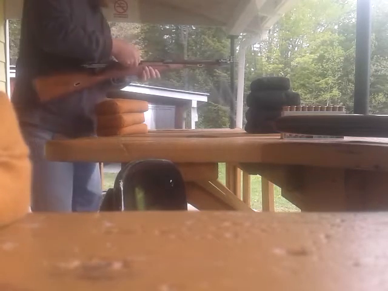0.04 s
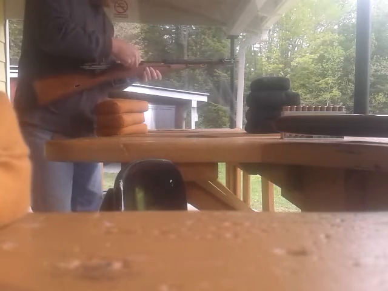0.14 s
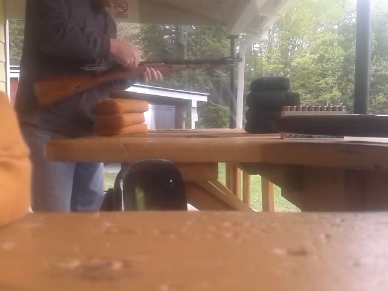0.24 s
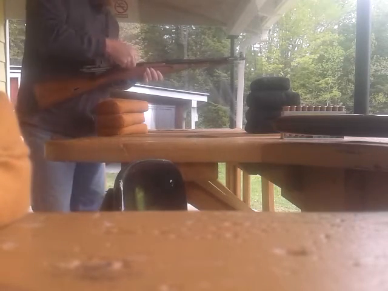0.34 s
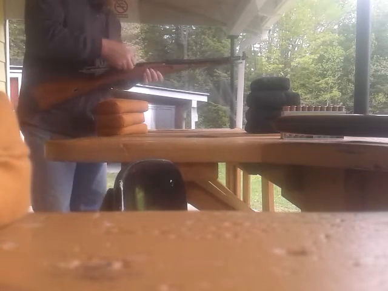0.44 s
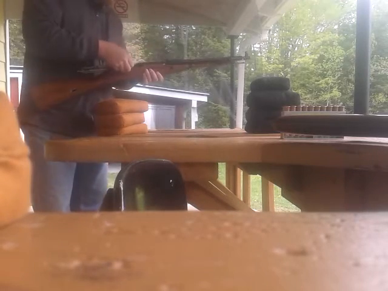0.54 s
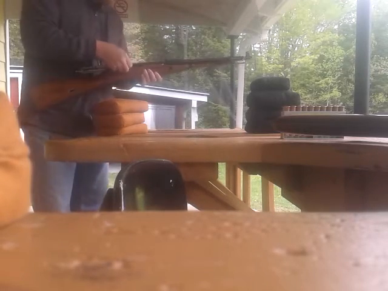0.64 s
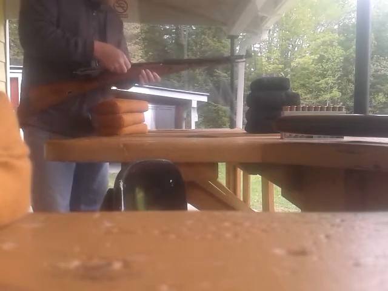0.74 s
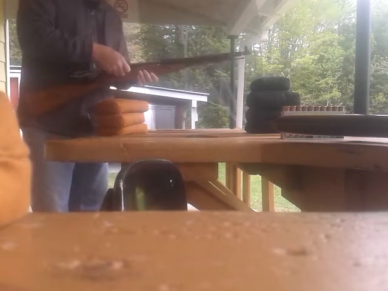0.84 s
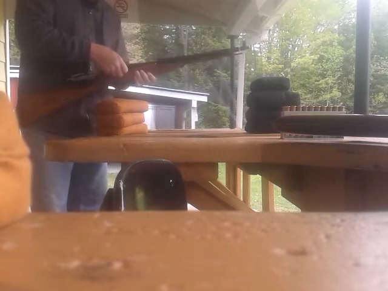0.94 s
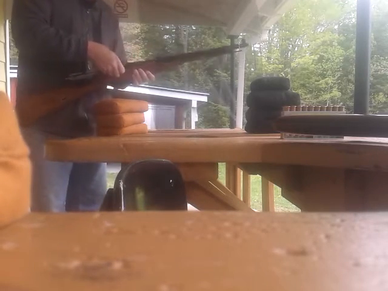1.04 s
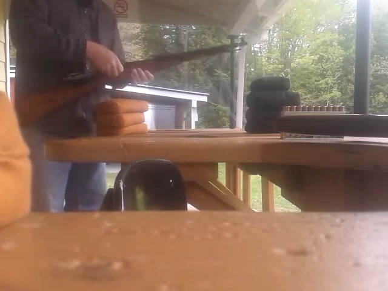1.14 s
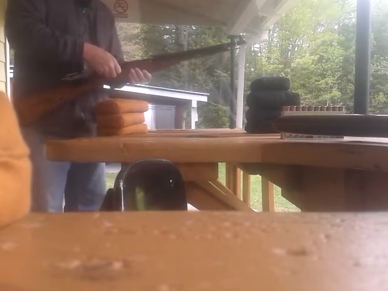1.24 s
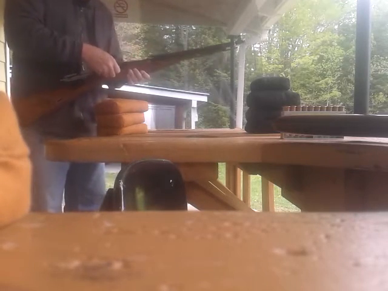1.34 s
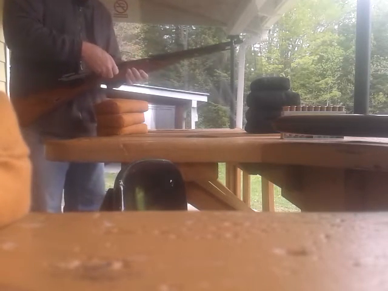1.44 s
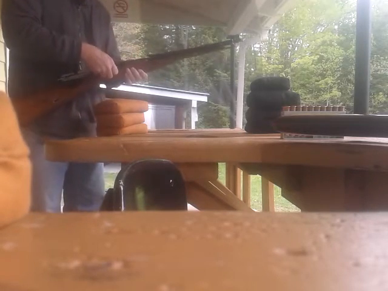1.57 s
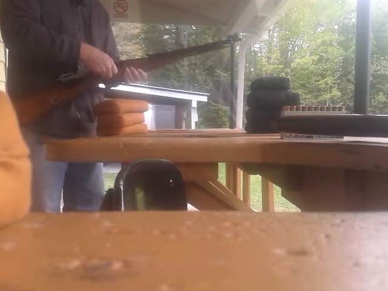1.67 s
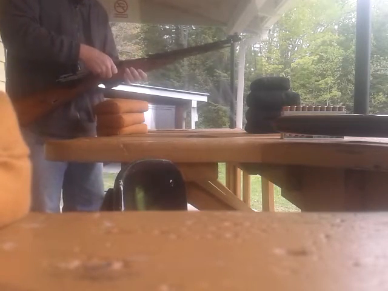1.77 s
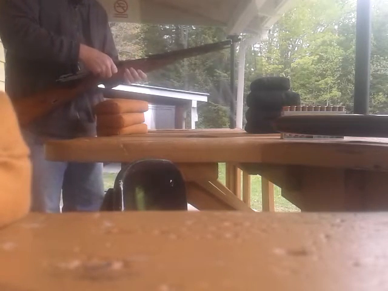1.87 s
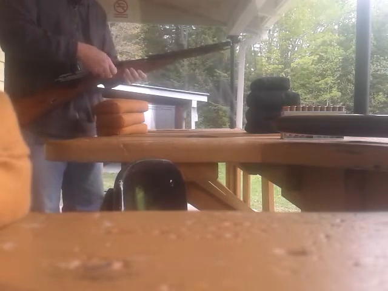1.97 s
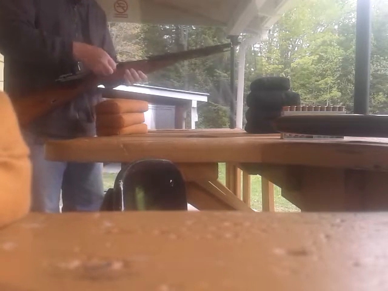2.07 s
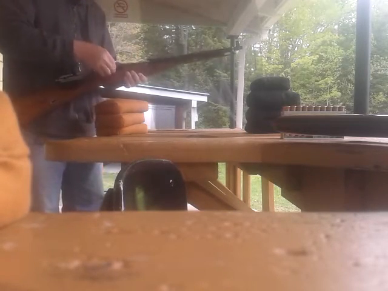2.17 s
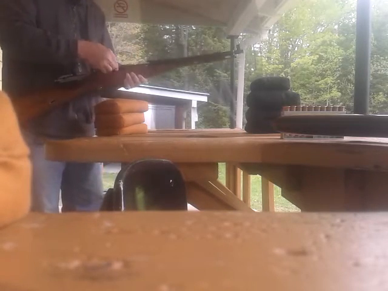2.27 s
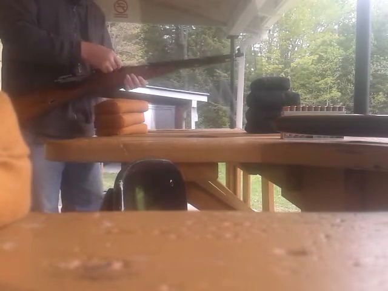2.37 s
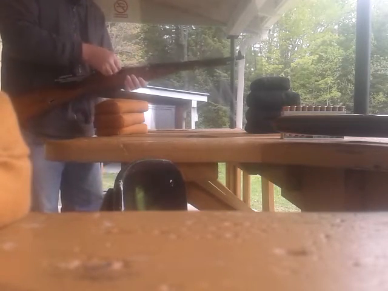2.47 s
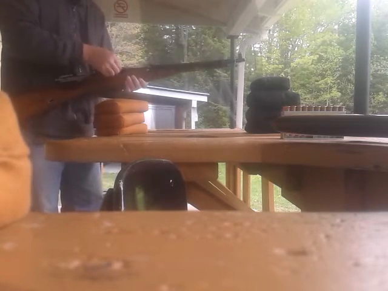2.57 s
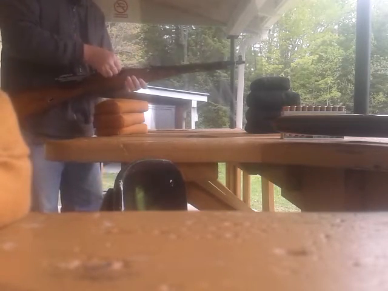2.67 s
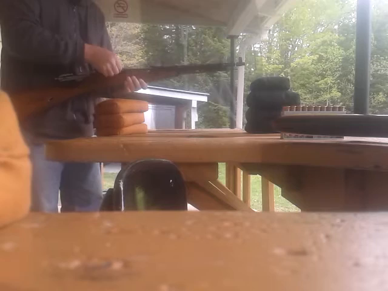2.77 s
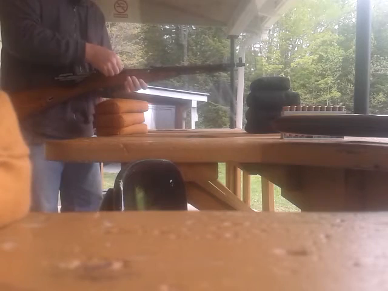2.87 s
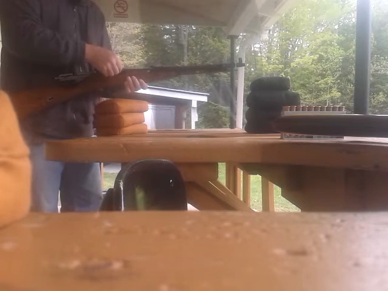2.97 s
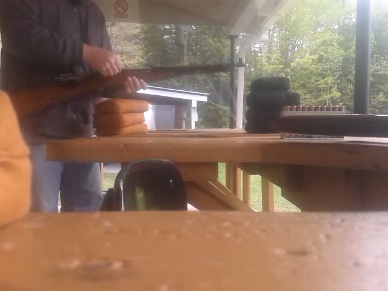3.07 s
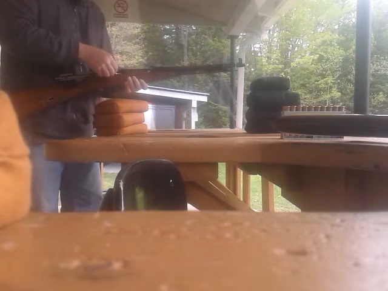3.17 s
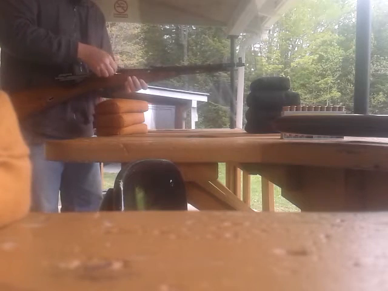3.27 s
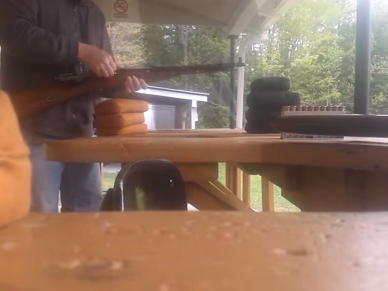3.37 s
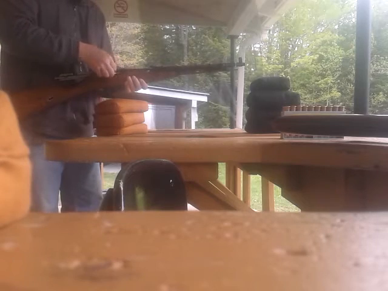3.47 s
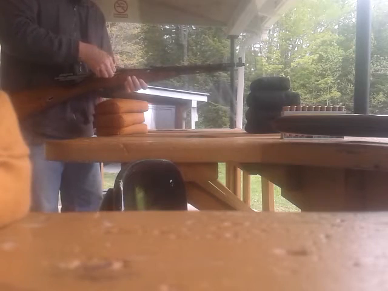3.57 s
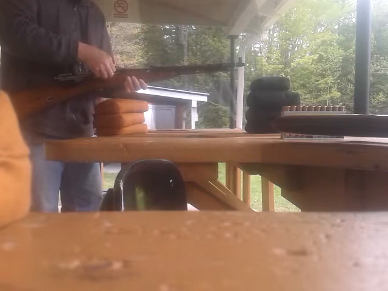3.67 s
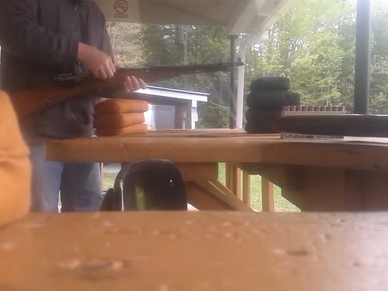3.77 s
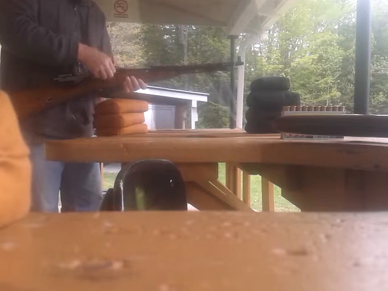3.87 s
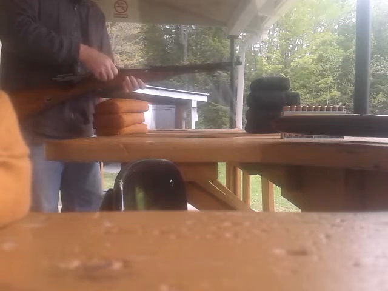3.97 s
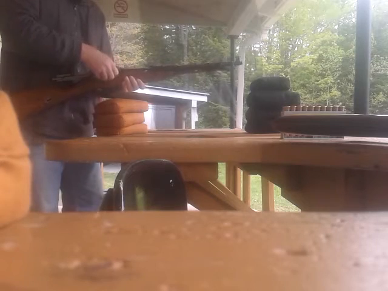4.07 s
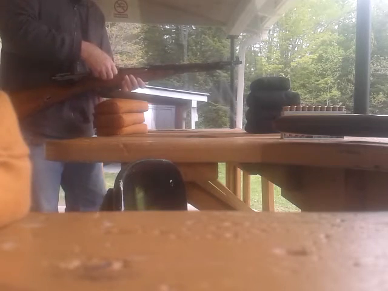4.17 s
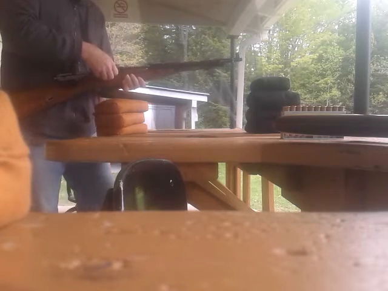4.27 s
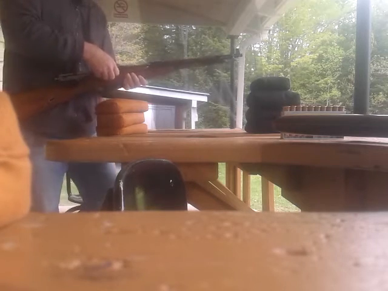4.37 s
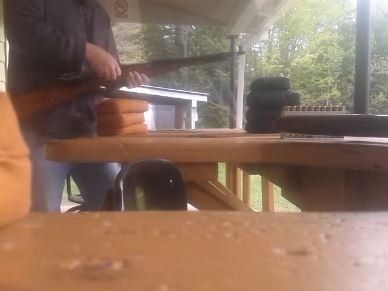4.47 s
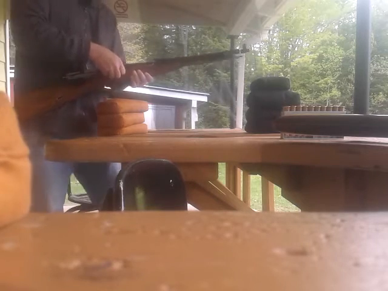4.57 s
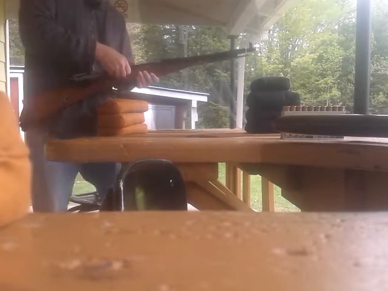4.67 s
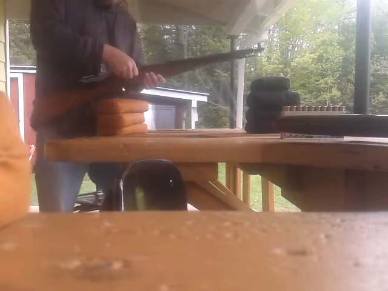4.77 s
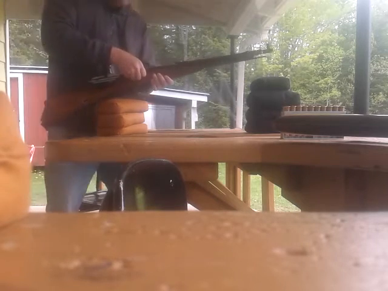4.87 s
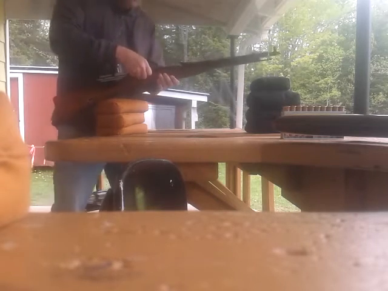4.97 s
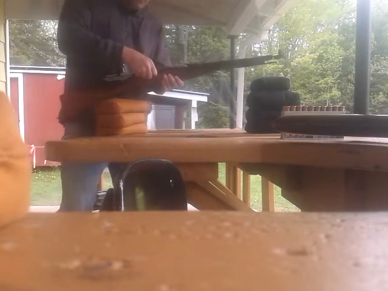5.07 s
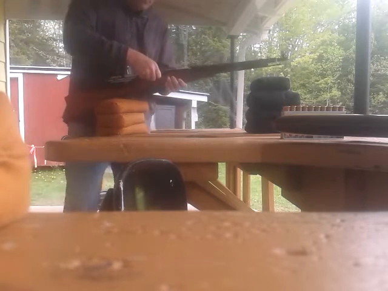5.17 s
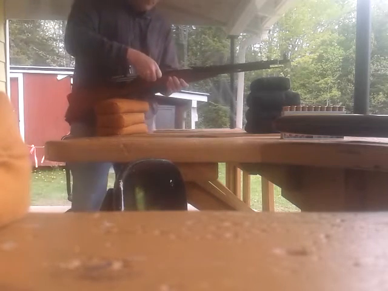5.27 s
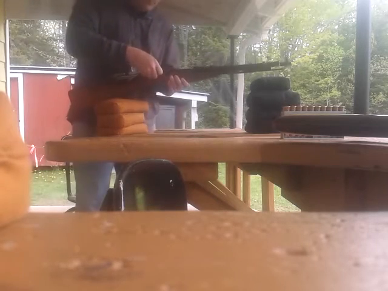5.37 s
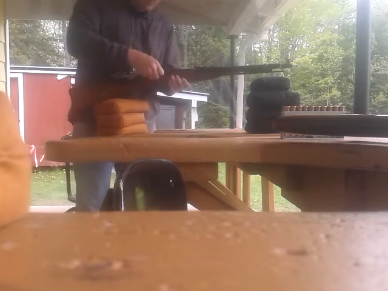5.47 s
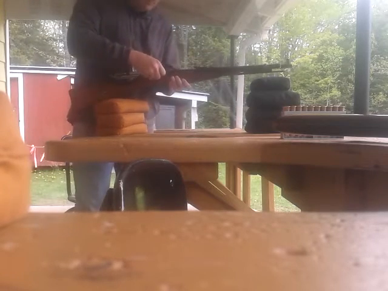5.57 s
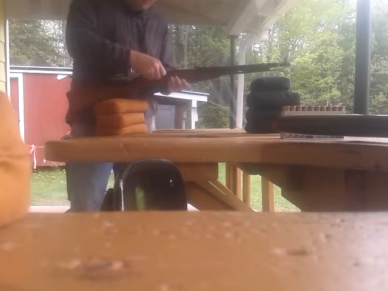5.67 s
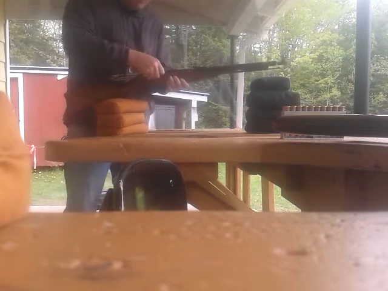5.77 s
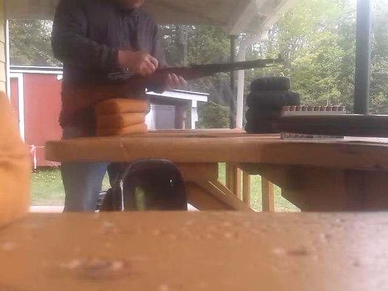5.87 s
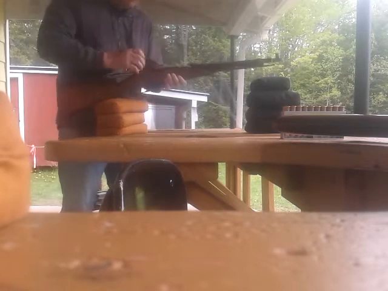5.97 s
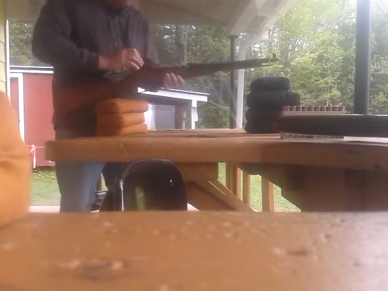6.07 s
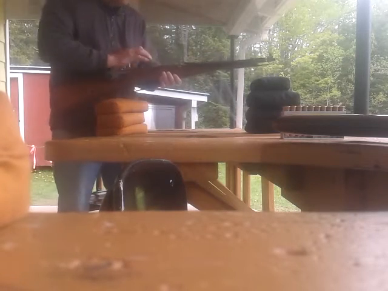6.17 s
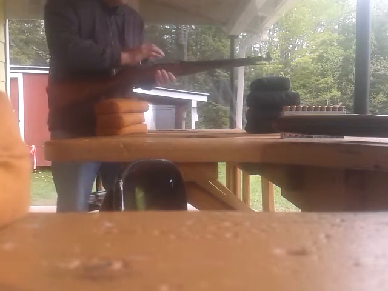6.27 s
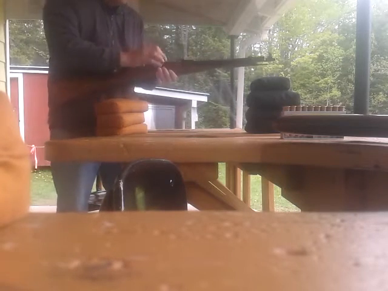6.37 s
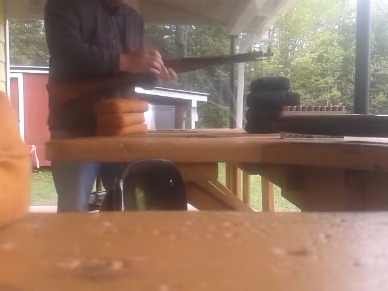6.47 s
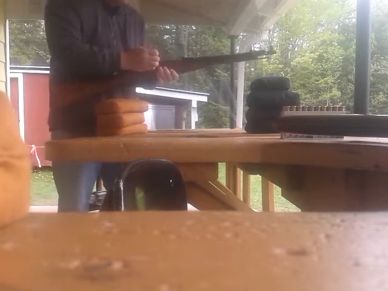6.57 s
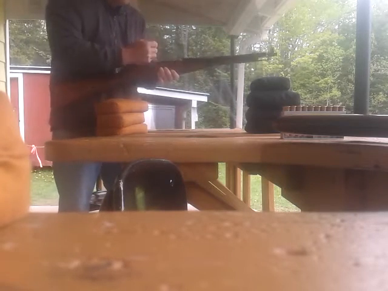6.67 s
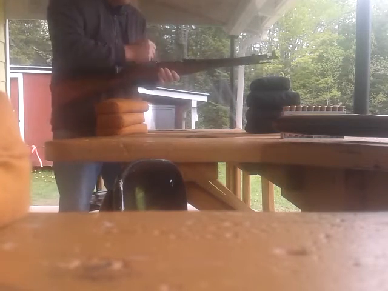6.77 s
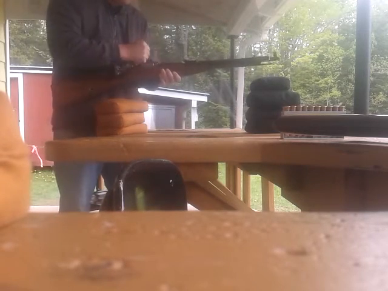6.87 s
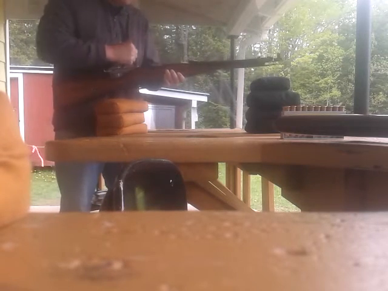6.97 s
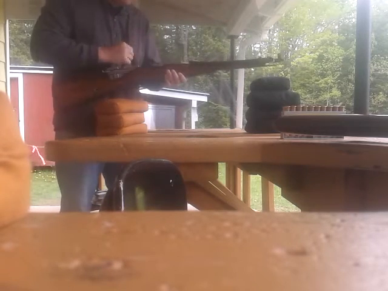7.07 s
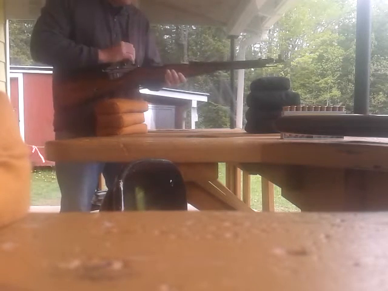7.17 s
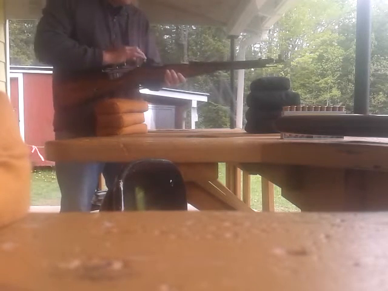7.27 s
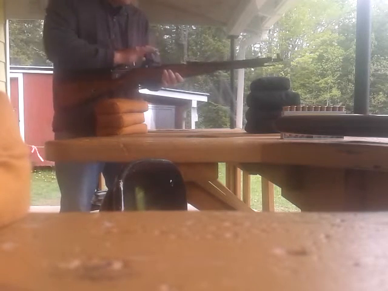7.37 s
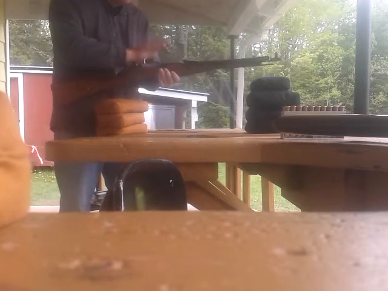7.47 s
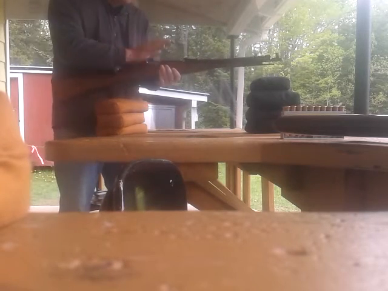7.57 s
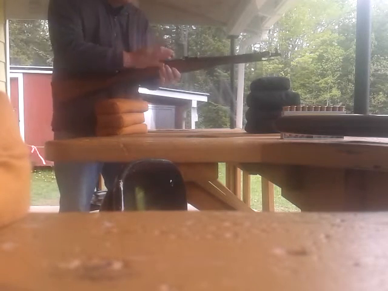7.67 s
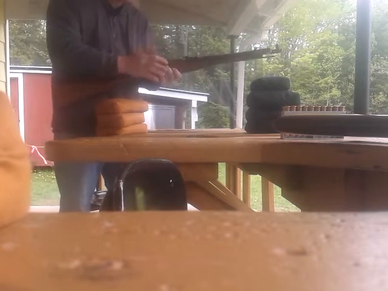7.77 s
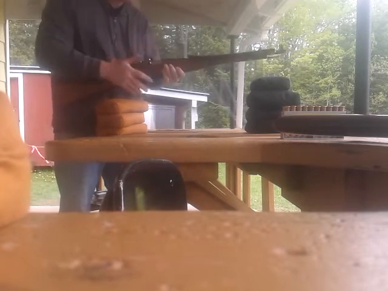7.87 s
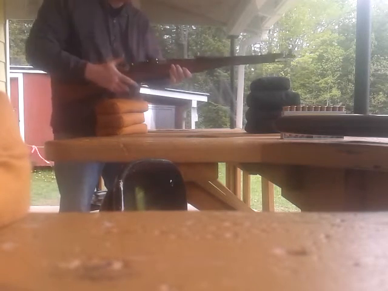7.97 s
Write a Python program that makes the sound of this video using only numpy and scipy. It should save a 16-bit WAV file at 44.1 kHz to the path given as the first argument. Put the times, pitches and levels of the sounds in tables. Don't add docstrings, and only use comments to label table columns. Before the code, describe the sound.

Faint, steady leaf and microphone hiss sits far beneath close rifle handling. From 0 to 1.5 seconds, sparse tiny steel clicks, blunt taps and hollow stock touches; a sharper ping at 1.2 and a firm cartridge snap near 1.6. A thin bird whistle barely shows at 1.9. From 2 to 4 seconds, light irregular ticks and small brass rings continue, growing busier to bright snaps around 4.2-4.3, then clicks and a short fading rub near 5. Softer knocks and dull thuds follow until 5.9, with faint bird notes at 5.5. At 6.2 the bolt chatters and scrapes, then clacks very loudly at 6.3, 6.4 and 6.7, locking with clustered clacks around 7.0. Another gritty slide from 7.3 ends in slams at 7.5 and 7.6, slightly distorted, with quick porch echoes and a short tail. Faint bird whistles close over hiss near 7.9.

```python
import sys
import numpy as np
from scipy import signal
from scipy.fft import rfft, irfft
from scipy.io import wavfile
from scipy.ndimage import uniform_filter1d

SR = 44100
rng = np.random.default_rng(int(sys.argv[2]) if len(sys.argv) > 2 else 0)


def file_out(sig):
    cols = np.atleast_2d(sig).T
    lim = np.clip(cols, -1, 1)
    pcm = np.round(lim * 32767).astype(np.int16)
    wavfile.write(sys.argv[1], SR, pcm)


def makeup_ratio(level_db):
    decades = np.asarray(level_db, float) / 20
    return 10 ** decades


N = 353682
HZ = np.fft.rfftfreq(4096, 1 / SR)


def unit_rms(x):
    return x / np.sqrt(np.mean(x ** 2) + 1e-20)


def read_spectrum(points, hz):
    f, value = np.transpose(points)
    return np.interp(np.log(hz + 1), np.log(f + 1), value)


def add(mix, s, sound):
    part = mix[round(s * SR):][:len(sound)]
    part += sound[:len(part)]


def highpass(x, hz, order):
    return signal.sosfilt(signal.butter(order, hz, "high", fs=SR, output="sos"), x)


def ring(modes):
    hz, db, t60_s = np.transpose(modes)[:, :, None]
    t = np.arange(2600) / SR
    decay = makeup_ratio(db - 60 * t / np.maximum(t60_s, .001))
    sound = (decay * np.sin(2 * np.pi * hz * t)).sum(0)
    return sound / np.linalg.norm(sound)


def humps(modes, db, stretch=1):
    hz, width_hz, top_db = np.transpose(modes)[:, :, None]
    detune = 2 * (HZ - stretch * hz) / width_hz
    power = (makeup_ratio(2 * top_db) / (1 + detune ** 2) ** 1.715).sum(0)
    return makeup_ratio(2 * db) * power / power.mean()


def click(power, late_s=0 * HZ):
    cepstrum = irfft(np.log(power + 1e-12) / 2)
    cepstrum[1:2048] *= 2
    cepstrum[2049:] = 0
    delay_phase = 2j * np.pi * HZ[1] * np.cumsum(late_s)
    return irfft(np.exp(rfft(cepstrum) - delay_phase))[:2000]


# frequency in Hz, level in dB per Hz.
AIR = [(15, -41), (25, -5), (35, 19.5), (49, -37), (76, -15), (384, 2), (911, 0.5), (1100, -1.5),
       (1290, -4.5), (1610, -5.5), (2840, -2.5), (5140, -4), (6560, -18.5), (14800, -15), (16000, -12)]
# time in seconds, level in dB.
BREEZE = [(0, -58), (.15, -64.5), (.35, -64.5), (1, -65.5), (1.8, -65), (2.301, -69), (2.9, -67),
          (4.7, -64.5), (5.5, -67.5), (6.002, -67), (6.6, -62.5), (7.3, -63), (8.02, -65)]


def air():
    frames, hz = N // 256 + 5, np.fft.rfftfreq(1024, 1 / SR)
    a, b, patches = rng.standard_normal((frames, 513, 3)).T
    patches = uniform_filter1d(patches, 12, 0)
    patches = unit_rms(uniform_filter1d(patches, 14, 1))
    s, db = np.transpose(BREEZE)
    gust_db = np.interp(np.arange(frames) * 256 / SR, s, db - db.min())
    leaves = np.exp(-(np.log(hz + 1) - np.log(2500)) ** 2 / 3.9)[:, None]
    still = makeup_ratio(read_spectrum(AIR, hz)[:, None] + .8 * patches) * (a + 1j * b)
    still_rms = signal.istft(still, nperseg=1024, noverlap=768)[1].std()
    gusty = signal.istft(still * makeup_ratio(leaves * gust_db), nperseg=1024, noverlap=768)[1][:N]
    return makeup_ratio(db.min() + 10.5) / still_rms * gusty


# start in seconds, blow in dB, then stock, bright steel and sharp edge shares in dB.
CLACKS = [(6.3267, -6, -10.5, 1, -14), (6.421, -22.5, -19, -23, -13.5), (6.4365, -5.5, -15.5, -5.5, -8),
          (6.721, -22, -9, -2.5, -13), (6.7362, -3, -25.5, -1, -8), (6.9425, -19, -1, 0.5, -14),
          (6.976, -6.5, -37, -3.5, -14), (6.985, -23, -2, -4, -8.5), (7.0245, -11, -6.5, -5, -19.5),
          (7.036, -17.5, 0, -17, -6.5), (7.051, -9.5, -15, -6, -16.5), (7.06, -34, -26, -17, 8.5),
          (7.4885, -5, -12, -1, -7), (7.6135, -18, -9, 3, -11), (7.6325, -3.5, -16.5, -4.5, -9.5)]
SNAPS = [(0.7842, -29.5, -19, -1.5, -70), (1.5779, -13, -23, -7, -15), (1.7255, -25, -31, -1, -46),
         (1.9839, -29, -3.5, -9, -12), (3.3979, -25.5, -14, -4.5, -21), (3.824, -22, -4, -4, -14),
         (4.16, -27, -15, -26, -12), (4.308, -13.5, -12.5, -1, -17.5), (4.865, -37, 3, -6.5, -26),
         (4.939, -44.5, -6, 6, -15), (5.7805, -36, -1, -7, -21)]
CHATTER = [(6.2517, -32, -20, 5, -28), (6.255, -24, -26, -3, -29), (6.265, -22, -7, -3, -32),
           (6.272, -22, -11, -5, -30), (6.2794, -14.5, -11, -5, -32), (6.282, -16.5, -26, 0, -31),
           (6.293, -25, -15, -5, -12), (6.305, -27, -10, -5, -27), (7.4009, -22, -6, -4, -27),
           (7.41, -23, -7, -1.5, -21.5), (7.4221, -14.5, -17, -3.5, -13), (7.436, -20, -10, -5, -18),
           (7.443, -21.5, -5, 0, -20), (7.45, -11, -17, -6.5, -21), (7.463, -21, -11, -7, -16),
           (7.473, -15.5, -9, -3, -13), (6.331, -18, -22, 5, -8), (6.343, -22, -16, -9, -5),
           (6.3726, -31, -12, -7, -18), (7.457, -20.5, -11, -0.5, -19), (7.427, -23.5, -12, 2, -17),
           (7.499, -12, -20, -10, -17.5)]
# start in seconds, blow in dB, stock and bright steel shares in dB.
CLICKS = [(0.1066, -52.5, -11, 2), (0.418, -30, -12.5, 0.5), (0.651, -42.5, -9, -2), (1.2, -31, -2, -5),
          (1.22, -20.5, -4, -10), (1.2297, -38, 7, -12), (1.459, -37, 2.5, -1.5), (1.589, -19, -8.5, -7),
          (1.994, -25.5, -31, -5.5), (2.4777, -47, -4, 4), (2.4874, -44, -4, -16),
          (2.5087, -31.5, -10, -3.5), (2.599, -32.5, -14, -3), (2.637, -36, -6.5, 3),
          (2.745, -37.5, -13, -6), (3.071, -38.5, -3, 2), (3.089, -34, -17, -6), (3.279, -40, -3, -1),
          (3.2883, -33.5, -4.5, -14), (3.456, -39, -5.5, 1), (3.7094, -39, -31, -5.5),
          (3.9557, -31.5, -3.5, -9), (3.9883, -26.5, -9, -3.5), (4.1727, -22, -14, -4),
          (4.5628, -29.5, -8.5, -6), (4.963, -21, -3, -1.5), (5.007, -26, -9, -7), (5.673, -41, 2, 2),
          (5.8365, -35, -4, -6)]
TAPS = [(0.1694, -35, -28, -5), (0.2367, -36, -26, -34), (0.252, -44.5, -11, -9), (0.4575, -28.5, -14, -12),
        (0.4701, -23, -18, -11), (1.1448, -38, -16, -30), (1.1572, -33, -16, -16), (1.65, -28.5, -6, 0.5),
        (1.73, -39.5, 1, -22), (2.648, -34.5, -13, -4), (2.6868, -22.5, -18, -9),
        (2.957, -35.5, -15, -13.5), (3.041, -45.5, -21, -13.5), (3.1132, -34, -5.5, -5),
        (3.2237, -32, -15, -14), (3.2373, -30.5, -21, -7.5), (3.661, -40.5, -22, -14),
        (4.134, -40, -1.5, -6), (4.234, -16, -19, 0.5), (5.0718, -31.5, -6, -2), (5.266, -27, -6, -26),
        (6.0394, -44.5, -10, -17),
        (0.57, -36, -1.5, -7.5), (0.8876, -55.5, 9, -3), (0.995, -54.5, 4, -2), (1.0075, -57, 12.5, -19),
          (1.024, -24.5, -6.5, -11), (1.0366, -28, -1, -8.5), (1.1893, -31, -12, -2),
          (1.4342, -41.5, 0, -4), (2.1229, -42, -9, -9), (3.357, -43, -4.5, -9), (3.5862, -34, -10, -2),
          (3.622, -43, 2.5, 2.5), (3.9448, -40, 4.5, -4), (4.1203, -58, 9, -3), (4.511, -47, 1, -11),
          (4.894, -42.5, 0, -3.5), (4.956, -26, -12, -9), (5.1124, -31.5, -4.5, -9), (5.125, -29, -3, -12),
          (5.231, -52.5, 3, 0), (5.2534, -32.5, -4, 0), (5.6323, -38, -14, -5), (5.8214, -38.5, 1, -3)]
PLAY = [(6.169, -30, -10, -3), (6.205, -40, 0, -5), (6.638, -49, -3.5, -2), (6.6941, -32, -8.5, 1),
        (6.881, -41.5, -3, -2), (6.9058, -27, -20, 0.5), (6.96, -26.5, -13, -3), (7.007, -19, -12, -6),
        (7.337, -30.5, -11, -9.5), (7.346, -31.5, -8.5, 5), (7.3824, -25.5, -10, -23),
        (7.5961, -26.5, -7, -5)]
# stock, bright steel and edge shares in dB.
TOUCH_SHARES_DB = (-4, -10, -36)


def blows():
    touch_lead_s, touch_db, touch_follows = 0.0079, -39, 0.48
    touches = [(s - touch_lead_s, touch_db + touch_follows * (db + 31), *TOUCH_SHARES_DB)
               for s, db, *_ in SNAPS]
    blunt_edge_db, blunt_loss = -24.5, 0.27
    blunt = [(*row, blunt_edge_db - blunt_loss * (row[1] + 36)) for row in TAPS]
    clicks = [(*row, -15) for row in CLICKS]
    play = [(*row, -20) for row in PLAY]
    return CLACKS + SNAPS + touches + blunt + clicks + play + CHATTER


# frequency in Hz, width in Hz, level in dB.
STOCK = [(950, 1140, -9), (1090, 146, -0.5), (1190, 490, -6)]
ACTION = [(1770, 500, -20), (2240, 500, -10), (3004, 1600, -2.5)]
STEEL = [(3900, 630, -7), (4710, 1260, 0.5), (5344, 640, 0), (7280, 500, -15.5)]
EDGE = [(7300, 4200, -0.5), (11030, 1400, -10), (13540, 23000, -17.5)]


def contact(blow_db, stock_db, bright_db, edge_db, action_hz, luck):
    steel_lag_s = 0.003
    action = humps(ACTION, -3, action_hz / 2900)
    stock = humps(STOCK, stock_db, 1 + .015 * luck[0])
    steel = humps(STEEL, bright_db, 1 + 0.041 * luck[2])
    edge = humps(EDGE, edge_db - 1.5)
    ripple = makeup_ratio(2 * 2.6 * np.interp(HZ, np.linspace(0, SR / 2, len(luck)), luck))
    late_s = .0008 * np.interp(HZ, np.linspace(0, SR / 2, 20), abs(luck[:20]))
    first = click((stock + action / (1 + (HZ / 5500) ** 4)) * ripple, late_s)
    after = click((steel + edge) * ripple, late_s + steel_lag_s)
    return makeup_ratio(blow_db + 16.5) * (first + after)


# start in seconds, level in dB.
CASES = [(1.982, -31), (3.0747, -21), (3.112, -26), (3.237, -34), (3.2915, -32.5), (3.3965, -25),
         (3.458, -34), (3.5886, -29.5), (4.1604, -38.5), (7.436, -13.5), (7.4466, -15.5)]
# frequency in Hz, level in dB, t60 in seconds.
BRASS = [(5762, 1, 0.031), (5590, 0, 0.0099), (12800, -31, 0.026), (15400, -28.5, 0.03)]


def contacts():
    out, rows = np.zeros(N), blows()
    free_hz, held_hz_per_db, held_from_db = 2920, 46.5, -6
    spots = rng.standard_normal((139, 60))
    spots = np.resize(spots, (len(rows), 60))
    for (s, blow_db, stock_db, *shares), luck in zip(rows, spots):
        action_hz = free_hz - held_hz_per_db * max(stock_db - held_from_db, 0)
        action_hz *= 1 + .035 * luck[1]
        add(out, s, contact(blow_db, stock_db, *shares, action_hz, luck))
    for s, db in CASES:
        add(out, s, makeup_ratio(db + 14.5) * ring(BRASS))
    return out


# start in seconds, level in dB, frequency
# in Hz.
RINGS = [(0.4214, -35, 5460), (0.785, -31, 2650), (0.785, -26.5, 3250), (0.786, -39, 5350),
         (1.027, -33, 1120), (1.476, -30.5, 4800), (1.579, -20, 1100), (1.983, -30, 2670),
         (2.127, -40.5, 1120), (3.075, -36.5, 1100), (3.4, -30, 1120), (3.588, -27, 1118),
         (3.589, -29, 2920), (4.162, -23, 1110), (4.31, -23, 2690), (4.566, -34, 2930),
         (4.565, -30.5, 5000), (4.957, -22, 1150), (4.969, -22, 1090), (5.256, -30.5, 1090),
         (5.782, -37, 855), (6.447, -9.5, 1890), (6.741, -12.5, 1090), (6.978, -7.5, 2280),
         (6.978, -14, 3150), (7.04, -25, 1070), (7.489, -5, 2450), (7.639, -7, 1870), (7.636, -15, 1090),
         (7.44, -22.5, 1090),
         (1.17, -28, 1270), (1.22, -38, 1300), (2.6, -36.5, 970), (3.252, -38, 1120),
           (3.459, -37.5, 1160), (3.829, -29.5, 1200), (3.945, -35, 1300), (4.004, -31, 1180),
           (4.867, -50, 1400), (5.074, -30.5, 1160), (5.115, -37, 1120), (5.127, -34, 1050),
           (5.679, -45, 1110), (6.945, -23, 1020), (0.89, -41, 1380), (0.88, -39, 1090), (1, -54, 1100),
           (1.462, -41, 1100), (3.403, -31, 2450), (5.64, -38, 1420), (5.846, -39, 1450),
           (4.183, -30, 1104), (2.14, -45, 1410), (1.441, -36, 1410), (7.655, -17.5, 1830),
           (4.744, -49, 1100), (4.794, -50, 1100), (4.965, -22.5, 1180), (4.982, -26.5, 1120),
           (5.03, -42, 1100), (5.154, -42, 1250), (7.52, -25, 1020), (7.033, -27, 1130)]


def rings():
    out, decay_cycles, pair_ratio = np.zeros(N), 42, 1.035
    for s, db, hz in RINGS:
        t60_s = decay_cycles / hz
        add(out, s, makeup_ratio(db + 16.5) * ring([(hz, 0, t60_s), (pair_ratio * hz, -8, 0.8 * t60_s)]))
    return out


# start in seconds, level in dB, frequency in Hz.
PINGS = [(0.464, -36, 5700), (0.574, -35, 2600), (0.772, -36, 5530), (1.026, -33, 3030),
         (1.144, -31.5, 3100), (1.149, -41, 4930), (1.2221, -16.5, 4950), (1.231, -33, 3900),
         (1.461, -46, 5200), (1.582, -21, 5400), (1.725, -35, 4876), (2.48, -40, 5660), (2.511, -30, 4700),
         (2.6, -36, 2200), (2.639, -33, 5430), (2.69, -31, 5200), (3.221, -38, 2950), (3.829, -26, 2240),
         (3.844, -26.5, 4040), (3.9912, -22, 5500), (4.172, -38, 3000), (4.957, -35, 2980),
         (5.009, -34, 5000), (5.073, -27, 3000), (5.676, -49, 5260), (5.842, -42, 4760),
         (6.038, -46.5, 2680), (6.286, -15, 4870), (6.33, 0.5, 5000), (6.332, -16, 3400),
         (6.741, -13, 4600), (6.732, -14, 2920), (6.945, -16, 3000), (7.025, -15, 4710),
         (7.0347, -15, 5640), (7.05, -12.5, 5800), (7.0565, -10, 4630), (7.49, -4.5, 5070),
         (7.597, -31, 4700), (4.308, -11, 3080), (4.2338, -14.5, 3120), (4.3278, -19, 4302),
         (0.783, -25, 2900), (6.905, -27, 2900), (0.469, -26, 2830), (0.48, -31, 2140), (0.426, -29, 5500),
         (2.508, -42, 3040), (6.977, -9.5, 3180), (4.564, -29, 2820), (4.252, -22, 4500),
         (6.44, -11.5, 3540), (7.4524, -15, 5650), (7.615, -16, 5000), (7.633, -10, 5540),
         (6.906, -29, 4900), (6.169, -36, 4480), (6.696, -30, 5003), (6.349, -21, 5100), (7.441, -23, 5670),
         (4.185, -45, 14800), (4.235, -44, 13500), (4.31, -48, 13200), (4.313, -45, 15000),
         (6.29, -41.5, 14800), (1.655, -34, 5600), (3.837, -31, 5200)]


def pings():
    out, decay_cycles = np.zeros(N), 30
    for s, db, hz in PINGS:
        t60_s = decay_cycles / hz
        add(out, s, makeup_ratio(db + 16.5) * ring([(hz, 0, t60_s), (0.99 * hz, -6, t60_s)]))
    return out


# start in seconds, level in dB.
THUMPS = [
    (1.223, -50),
    (1.581, -54),
    (4.235, -51),
    (4.311, -41),
    (6.329, -19),
    (6.444, -32),
    (6.743, -24.5),
    (6.979, -25),
    (7.489, -18),
    (7.645, -21),
]


def thumps():
    out, thump_s = np.zeros(N), 0.0034
    u = np.arange(1500) / SR / thump_s
    for s, db in THUMPS:
        add(out, s, makeup_ratio(db) * u * (2 - u) * np.exp(-u * 2.2))
    return highpass(out, 60, 1)


# start in seconds, end in seconds, first level in dB, last level in dB, bright share in dB.
SLIDES = [
    (4.154, 4.307, -34.5, -37.5, 1.5),
    (6.159, 6.362, -39.5, -25, -4),
    (6.342, 6.454, -57, -19, 2),
    (6.692, 6.735, -51, -19, -2),
    (6.902, 6.97, -21.5, -39, -8),
    (7.327, 7.488, -48, -17.5, 2.5),
    (7.582, 7.655, -41, -24, -2),
    (1.42, 1.52, -47.5, -52, 4),
    (4.975, 5.075, -26.5, -51, -2),
    (5.09, 5.172, -39, -55, -2),
]


def slides():
    out = np.zeros(N)
    dull = click(humps(STOCK, -2) + humps(ACTION, -1.5))
    bright = click(humps(STEEL, -3.0) + humps(EDGE, -16.0))
    sizes = makeup_ratio(2.12 * rng.exponential(1, N))
    marks = unit_rms(sizes * (rng.random(N) < 500 / SR))
    for start, end, first_db, last_db, bright_db in SLIDES:
        catch = marks[round(start * SR):round(end * SR)]
        level = makeup_ratio(np.linspace(first_db, last_db, len(catch)) - 11.0)
        level *= signal.windows.tukey(len(catch), .1)
        add(out, start, signal.fftconvolve((catch - catch.mean()) * level, dull + makeup_ratio(bright_db) * bright))
    return out


# start in seconds, end in seconds, level in dB, first frequency in Hz, last frequency in Hz.
BIRD = [
    (1.905, 1.965, -58, 2760, 2740),
    (5.48, 5.63, -62, 3400, 3460),
    (5.53, 5.635, -60.5, 3720, 4080),
    (7.81, 7.88, -59, 3640, 3660),
    (7.855, 7.925, -61, 2880, 2980),
    (7.83, 7.9, -62, 2680, 2640),
]


def bird():
    out = np.zeros(N)
    waver = 1 + .009 * unit_rms(uniform_filter1d(rng.standard_normal(N), 300))
    for start, end, db, first_hz, last_hz in BIRD:
        at = np.arange(round(start * SR), round(end * SR))
        turns = np.cumsum(np.linspace(first_hz, last_hz, len(at)) * waver[at]) / SR
        add(out, start, makeup_ratio(db) * signal.windows.tukey(len(at), .5) * np.sin(2 * np.pi * turns))
    return out


# start in seconds, level in dB, frequency in Hz.
THUDS = [(4.667, -30.5, 456), (5.263, -31.5, 438), (5.799, -32.5, 740), (6.329, -18, 684), (6.44, -14, 695),
         (6.736, -13.5, 650), (7.488, -15, 650), (7.632, -12, 750), (6.906, -29.5, 600), (6.977, -26, 450),
         (7.03, -25, 580), (6.75, -27, 383), (7.642, -21.5, 364)]
KNOCKS = [
    (4.867, -53, 1200),
    (5.64, -28.5, 1400),
    (5.8457, -27.5, 1470),
]


def thuds():
    out = np.zeros(N)
    for s, db, hz in THUDS + KNOCKS:
        add(out, s, makeup_ratio(db + 6) * ring([(hz, 0, .015), (hz, -6, .012)]))
    return highpass(out, 250, 2)


# frequency in Hz, t60 in seconds.
PORCH = [(300, 0.22), (800, 0.29), (2100, 0.29), (5500, 0.22), (12000, 0.21)]
# delay in seconds, level in dB.
ECHOES = [
    (.0037, -11),
    (.0058, -12.5),
    (0.0116, -8.5),
    (.015, -15),
    (.0188, -8),
    (0.0212, -5.5),
]


def porch(x, notes, tail_db=-6, diffuse_db=6.5):
    size = SR // 2
    taps, at = np.zeros((3, size)), np.arange(40, size - 16, 16)
    shape = (3, len(at))
    np.put_along_axis(taps, at + rng.integers(0, 16, shape), rng.standard_normal(shape), axis=1)
    hz, t, z = signal.stft(taps, SR, nperseg=128)
    decay = makeup_ratio(-60 * t / read_spectrum(PORCH, hz)[:, None])
    tails = signal.istft(z * decay, SR, nperseg=128)[1][:, :size]
    past_early = 1 / (1 + np.exp(np.clip((.025 - np.arange(size) / SR) / .0045, -50, 50)))
    tails *= makeup_ratio(tail_db * past_early)
    tails *= makeup_ratio(diffuse_db) / np.linalg.norm(tails[0])
    turns = 3.1 * np.arange(N) / SR + np.arange(3)[:, None] / 3
    places = np.sqrt(2 / 3) * np.cos(2 * np.pi * turns)
    low_notes = signal.sosfilt(signal.butter(3, 1350, fs=SR, output="sos"), notes)
    out = signal.fftconvolve((x + makeup_ratio(-2) * low_notes) * places, tails, axes=1).sum(0)[:N]
    for s, db in ECHOES:
        add(out, s, makeup_ratio(db) * (x + notes))
    return out


def scene():
    thin_hz, ping_wet_db = 810, -5.5
    rifle = highpass(contacts() + slides(), thin_hz, 4) + thuds()
    near = highpass(pings(), thin_hz, 4)
    notes = highpass(rings(), thin_hz, 4)
    echoed = porch(rifle + makeup_ratio(ping_wet_db) * near, notes)
    return (rifle + near + notes + echoed + thumps() + bird() + air())[None]


def drop_masked_bands(x, under_db=38.5, bass_db=3):
    hz, t, z = signal.stft(x, SR, nperseg=2048, noverlap=1024)
    band = np.digitize(hz, np.r_[230, np.arange(700, SR / 2, 700)])
    averages = (band == np.arange(band.max() + 1)[:, None]) / np.bincount(band)[:, None]
    bands_db = 10 * np.log10(averages @ abs(z) ** 2 + 1e-20)
    total_db = 10 * np.log10((10 ** (bands_db[2:] / 10)).sum(0))
    bands_db[0] += bass_db
    keep = 1 / (1 + np.exp(np.clip(total_db - under_db - bands_db, -40, 40) * 2))
    return signal.istft(z * keep[band], SR, nperseg=2048, noverlap=1024)[1][:N]


def top_cut(x):
    return signal.sosfilt(signal.butter(12, 16810, fs=SR, output="sos"), x)


def record(dry):
    knee, ceiling, offset, edge_hz = .72, .76, -.0002, 15900
    squeezed = dry / (1 + abs(dry / knee) ** 8.0) ** (1 / 8.0)
    squeezed = squeezed - .002 * squeezed ** 8
    squeezed = dry + highpass(squeezed - dry, 300, 2) + offset
    squeezed = np.clip(squeezed, -ceiling, ceiling)
    band_limit = signal.firwin(511, edge_hz, window=("kaiser", 9), fs=SR)
    limited = signal.oaconvolve(squeezed, band_limit[None], "same")
    return top_cut(drop_masked_bands(limited[0])[None])


dry = scene()
out = record(dry)
file_out(out)
```